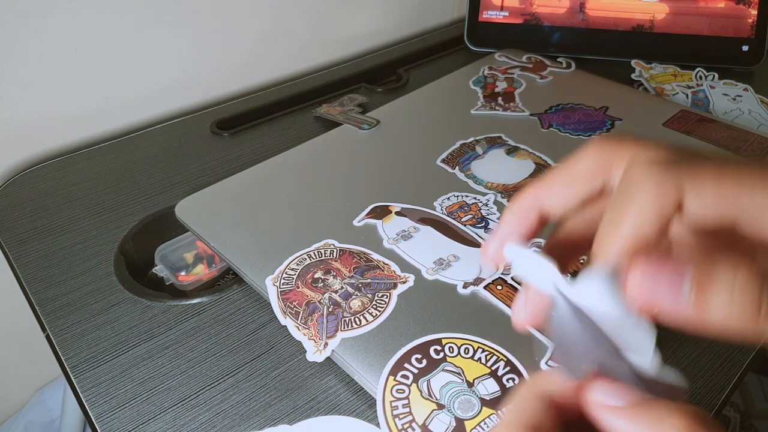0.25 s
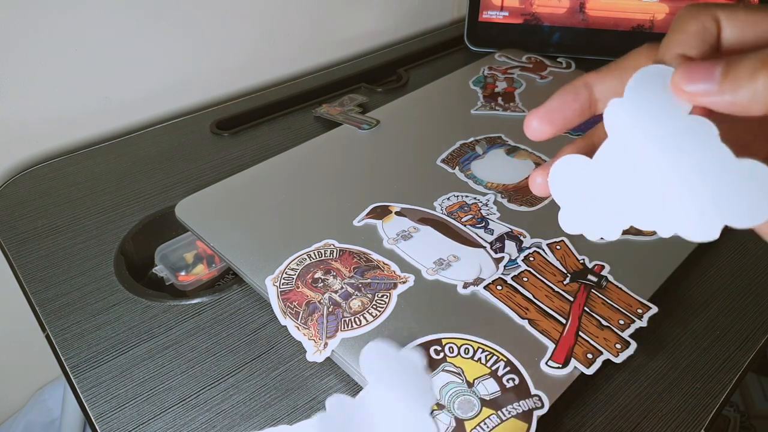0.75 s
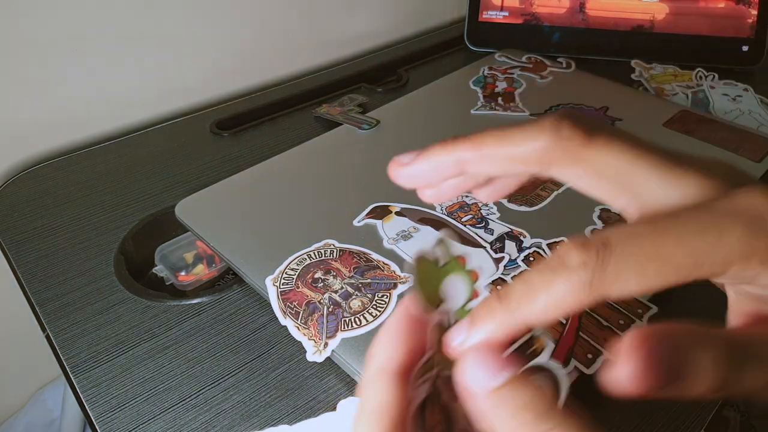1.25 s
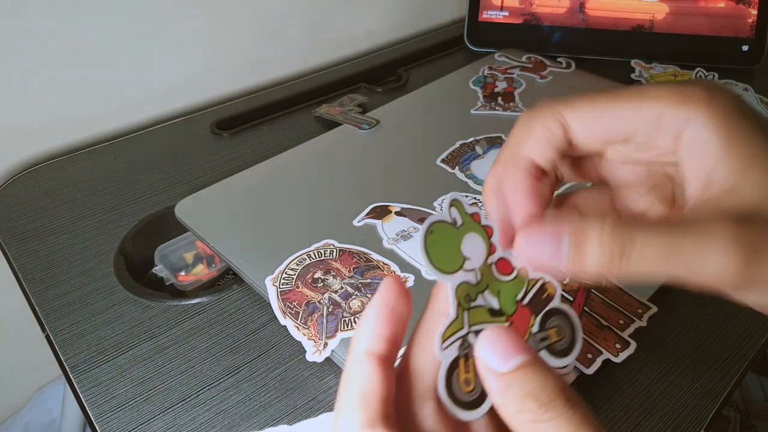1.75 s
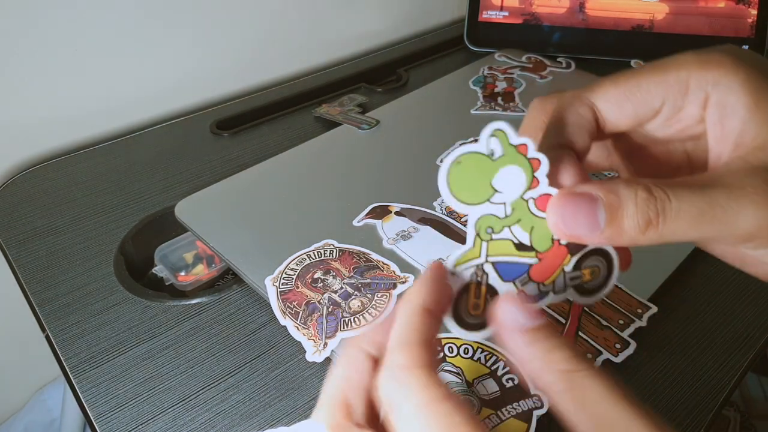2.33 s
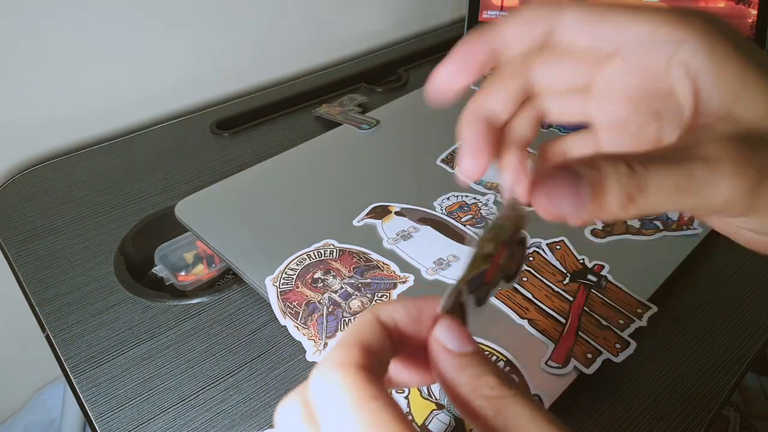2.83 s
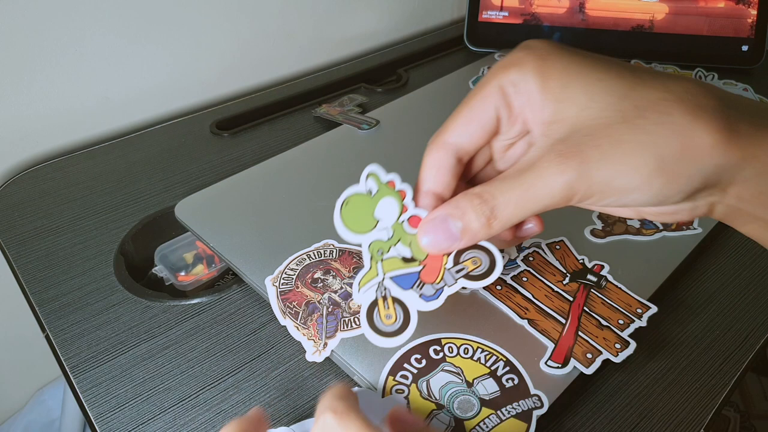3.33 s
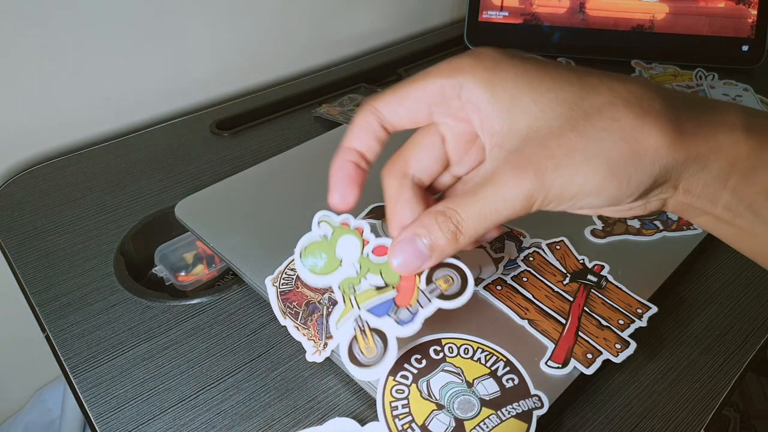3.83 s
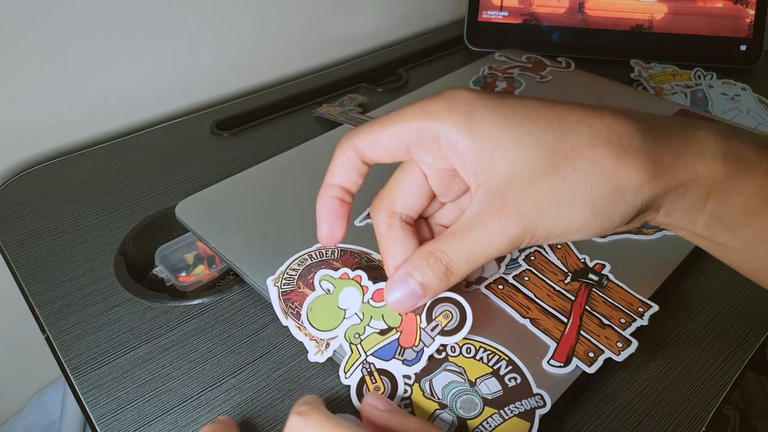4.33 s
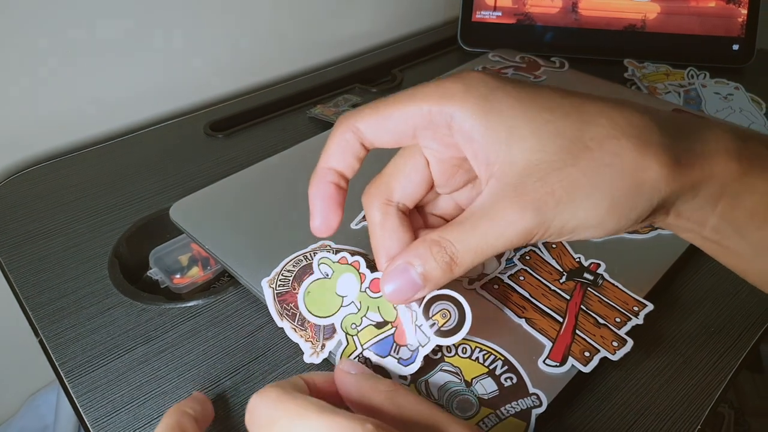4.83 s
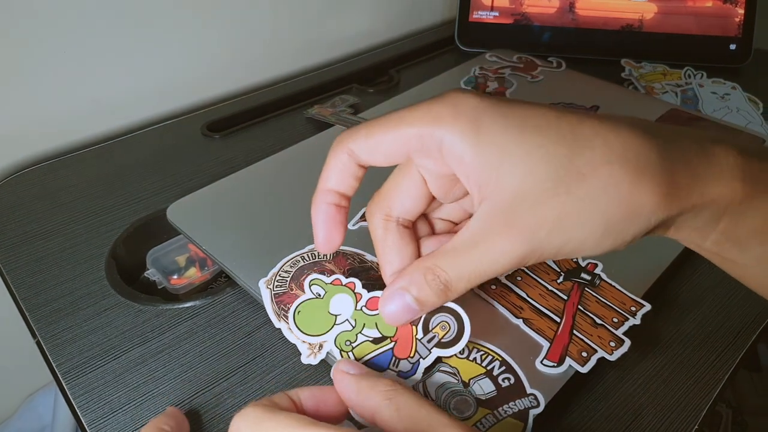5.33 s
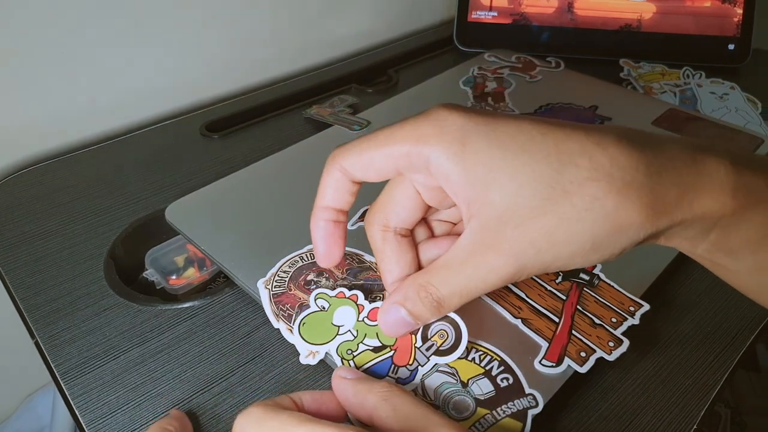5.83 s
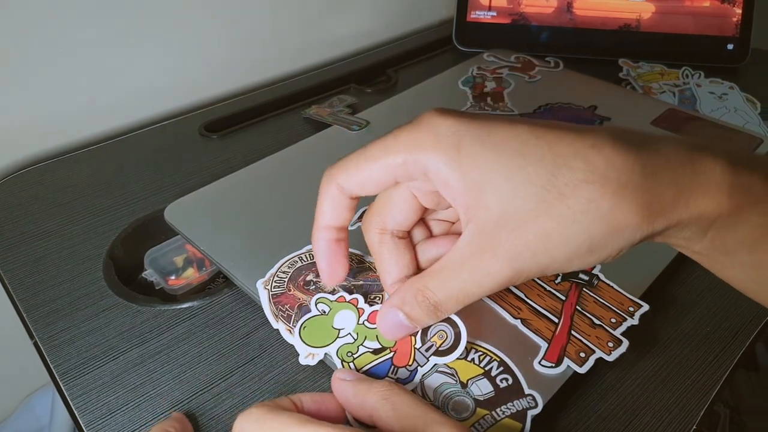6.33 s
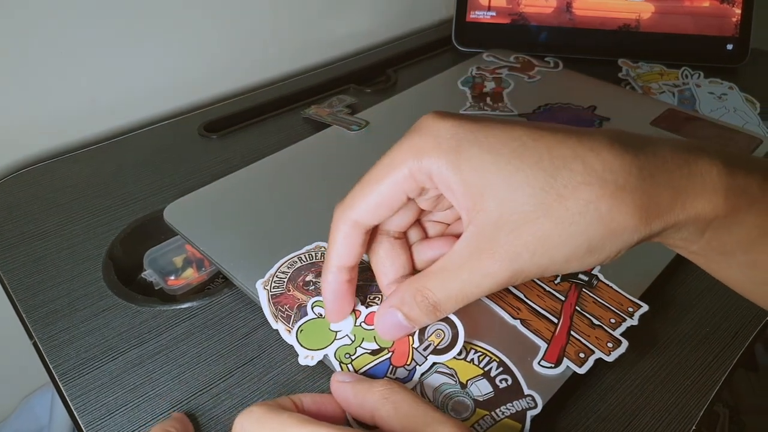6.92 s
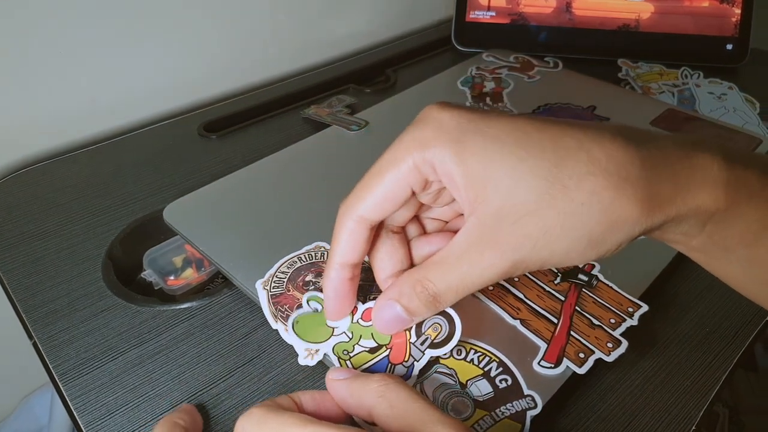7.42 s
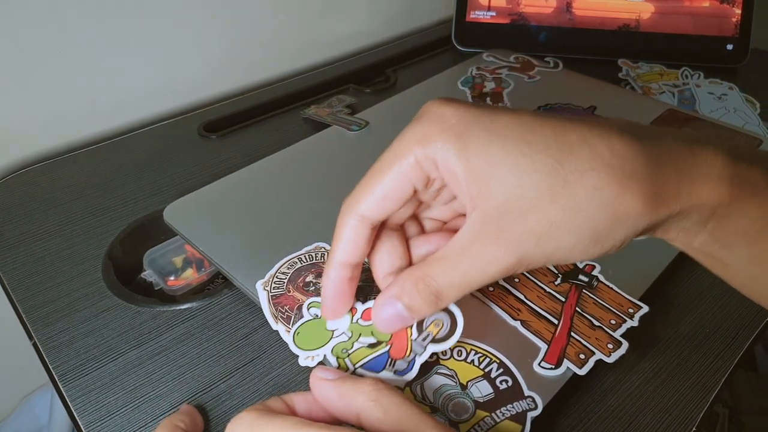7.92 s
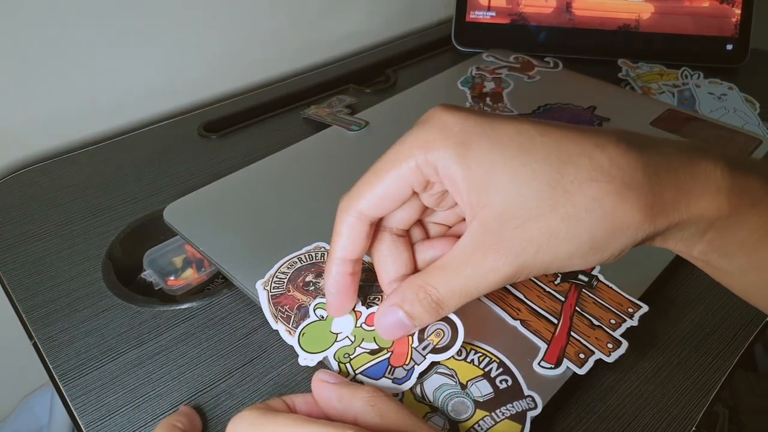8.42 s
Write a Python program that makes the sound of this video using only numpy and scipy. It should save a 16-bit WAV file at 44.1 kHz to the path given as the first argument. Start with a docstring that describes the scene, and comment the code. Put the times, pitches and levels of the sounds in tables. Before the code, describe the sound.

A very close stereo microphone in a small room hears a stiff vinyl sticker handled over a laptop lid, above steady low rumble, muffled air and faint hiss. From 0 to 0.6 s, small crackles quicken into a peel with a soft thud. Light rustles and ticks follow, then a bright snap near 1.3 s and clicks at 1.5 and 1.75 s. Around 2.1-2.2 s comes the densest burst, loud crinkling snaps with a low knock. More pops and dull taps fall at 2.8, 3.05-3.2, 3.65 and 3.8 s over thin rustling. A scrape at 4.8 s leads to a sharp crack at 5.03 s. Then it is nearly still, with barely audible touches and faint narrow whistles; deep hum grows from about 7 s. Crisp snaps break out at 7.47 s and, loudest and brightest, 7.77 s, with a short tail, leaving room rumble until 8.7 s.

```python
"""A stiff vinyl sticker sheet, peeled from its backing by hand and placed on a laptop lid, buckles in bursts
of clicks that ring its modes; glue and skin rustle as clumped random slips driving the same modes.
Fingers thud on the lid as decaying low modes. Filtered noise makes a low rumble, room air, a soft hiss
and a few faint whistles and hums. A small room answers, and a small two-port microphone is close by."""
import sys
import numpy as np
from scipy import signal
from scipy.io import wavfile
from scipy.ndimage import map_coordinates

SR = 44100
rng = np.random.default_rng(int(sys.argv[2]) if len(sys.argv) > 2 else 0)


def log_audio(samples):
    """Write samples as a 16-bit WAV file to the path given in sys.argv[1]."""
    # one column per channel
    frames = np.atleast_2d(samples).T
    # limit to full scale, then quantise
    limited = np.clip(frames, -1, 1)
    pcm = np.round(limited * 32767).astype(np.int16)
    wavfile.write(sys.argv[1], SR, pcm)


N = 382788

# modes of the sheet: (f/Hz, bandwidth/Hz, level/dB)
SHEET_MODES = [(760, 250, -9.5), (1240, 210, -3.5), (2000, 670, 0.76), (2580, 430, 4.6), (3256, 640, 1),
               (4470, 1200, 1.5), (6270, 1100, 3), (8700, 1900, 3.5), (11600, 7400, -2),
               (17000, 2300, -6.5)]


def from_db(db):
    """Amplitude ratio of a level: twenty decibels are a factor of ten."""
    return 10 ** (np.asarray(db) / 20)


def rms_one(x):
    """Normalise the mean power to one."""
    return x / np.sqrt(np.mean(x ** 2) + 1e-20)


def in_time(rows):
    """Linear interpolation of each column of a curve, one value a sample."""
    s, *columns = np.transpose(rows)
    return [np.interp(np.arange(N) / SR, s, c) for c in columns]


def at_hz(points, hz):
    """Spectrum level interpolated on a logarithmic frequency axis."""
    spectrum_hz, level_db = np.array(points).T
    return np.interp(np.log(hz), np.log(spectrum_hz), level_db)


def drift(rate):
    """Random modulation of unit rms: low-passed noise, computed at every 40th sample."""
    r = np.exp(-80 * np.pi * rate / SR)
    white = rng.standard_normal(N // 40 + 2002)
    slow = signal.lfilter([1], [1, -2 * r, r * r], white)[2000:]
    return np.interp(np.arange(N) / 40, np.arange(len(slow)), rms_one(slow))


def resonance(x, hz, width):
    """Damped resonator: a pole pair whose radius sets the bandwidth, scaled to keep a click's energy."""
    r = np.exp(-np.pi * width / SR)
    zeros = np.sqrt((1 - r * r) / 2) * np.array([1, 0, -1])
    poles = [1, -2 * r * np.cos(2 * np.pi * hz / SR), r * r]
    return signal.lfilter(zeros, poles, x + 1e-18)


def peak(x, hz, width, db):
    """Second-order equaliser: the gain ratio of two dampings lifts or cuts one band."""
    w, gain, slack = 2 * np.pi * hz / SR, from_db(db / 2), np.tan(np.pi * width / SR)
    zeros = [1 + slack * gain, -2 * np.cos(w), 1 - slack * gain]
    poles = [1 + slack / gain, -2 * np.cos(w), 1 - slack / gain]
    return signal.lfilter(zeros, poles, x)


def banded_noise(spectrum, patchy_db):
    """Coloured noise of unit rms: half-octave bands, each with its level, flicker and port correlation."""
    # left-right correlation: (f/Hz, likeness from -1 to 1)
    likeness = [(60, 0.74), (180, 0.89), (550, -0.47), (1650, -0.63), (4970, 1), (15000, -0.82)]
    out, edges = 0, 110 * 2 ** np.arange(0, 7.6, .5)
    white = rng.standard_normal((2, 2, N))
    for k, (low, high) in enumerate(zip(edges, edges[1:])):
        hz = np.sqrt(low * high)
        if spectrum[0][0] < hz < spectrum[-1][0]:
            band = signal.butter(2, [low, high], "band", fs=SR, output="sos")
            mid, side = signal.sosfilt(band, white[k % 2])
            alike = np.clip(at_hz(likeness, hz), -1, 1)
            gain = from_db(at_hz(spectrum, hz) + patchy_db * drift(2.7))
            out = out + gain * (np.sqrt(1 + alike) * mid + np.sqrt(1 - alike) * side * [[1], [-1]])
    return rms_one(out)


def clicks(count, per_s, spread_db):
    """Shot noise: impulses at random moments, of uneven size and either sign."""
    sizes = from_db(spread_db * np.minimum(rng.exponential(1, count), 4))
    signs = rng.choice([-1, 1], count)
    return sizes * signs * (rng.random(count) < per_s / SR)


def rumble():
    """Band-limited noise: two deep bands, nearly coherent at both ports, ending steeply on top."""
    # level curves: (t/s, deep band level/dB, upper band level/dB)
    rumble_levels = [(0, -56, -45.5), (.6, -48, -43), (1.5, -62, -45), (2.103, -50.5, -46.5),
                     (4.201, -61, -47.5), (5.3, -51.5, -45.5), (8.68, -58, -44)]
    deep_hz, upper_hz = (48.4, 76.5), (69.5, 106.2)
    out = 0
    for level_db, (low_hz, high_hz) in zip(in_time(rumble_levels), (deep_hz, upper_hz)):
        high_pass = signal.butter(2, low_hz, "high", fs=SR, output="sos")
        low_pass = signal.butter(6, high_hz, fs=SR, output="sos")
        noise = rng.standard_normal((2, N + SR))
        mid, side = signal.sosfilt(np.vstack([high_pass, low_pass]), noise)[:, SR:]
        stereo = rms_one(mid) + from_db(-17) * rms_one(side) * [[1], [-1]]
        out = out + from_db(level_db) * stereo
    return out


def room_air():
    """Diffuse noise of falling spectrum whose level follows a slow curve."""
    # level curve: (t/s, level/dB)
    air_levels = [(0, -51.5), (1.5, -54.5), (4.2, -55), (6, -57), (8.3, -58), (8.68, -54)]
    # relative spectrum: (f/Hz, density level/dB per Hz)
    air_colour = [(120, -16.5), (160, -9.5), (217, -4.5), (326, -1.5), (600, -7), (1130, -13.5),
                  (2000, -39), (3000, -46.5)]
    return from_db(in_time(air_levels)[0]) * banded_noise(air_colour, patchy_db=1.2)


def soft_hiss():
    """Stationary coloured noise with a slight random flicker in each band."""
    # relative spectrum: (f/Hz, density level/dB per Hz)
    hiss_colour = [(700, -22.5), (1000, -8.5), (1310, 1.5), (2390, -3.5), (3860, -7.5), (5280, -14),
                   (7490, -12.5), (9090, -27), (12000, -17.5), (19500, -13.5)]
    return from_db(-67) * banded_noise(hiss_colour, patchy_db=1.5)


def rubbing():
    """Exponential growth and decay: each rub's dB level rises, holds and falls in straight lines."""
    # glue letting go or skin sliding: (start t/s, length/s, drive level/dB, treble level/dB)
    rubs = [(0.367, 0.12, -61, -3), (0.665, 0.021, -81, 3), (0.865, 0.038, -54.5, -3.5),
            (1.247, 0.13, -54.5, -6), (1.5, 0.034, -61, -6), (2.084, 0.06, -44.5, -2),
            (2.415, 0.23, -68.5, -6), (3.04, 0.073, -64, -9), (3.14, 0.0333, -48, -8),
            (3.463, 0.41, -66.5, 1), (4.509, 0.056, -61.5, -13.5), (4.772, 0.38, -58.5, -4),
            (5.247, 0.096, -63, -5), (5.41, 0.041, -73, 2), (5.631, 0.064, -75.5, 1),
            (5.947, 0.038, -76.5, -0.5), (7.473, 0.087, -56.5, 0), (7.652, 0.012, -49.5, -0.5),
            (7.75, 0.027, -49, -1.5)]
    rise_db_per_s, fall_db_per_s = 505, 263.5
    idle_db, idle_highs_db, idle_ends_s = -73, -5, 4.1   # the held sheet rustles until it lies on the lid
    t = np.arange(N) / SR
    level_db = idle_db - fall_db_per_s * np.maximum(t - idle_ends_s, 0)
    highs_db = np.full(N, float(idle_highs_db))
    for start, length, db, bright_db in rubs:
        early, late = np.maximum(start - t, 0), np.maximum(t - start - length, 0)
        rub_db = db - rise_db_per_s * early - fall_db_per_s * late
        highs_db = np.where(rub_db > level_db, bright_db, highs_db)   # the strongest rub sets the treble
        level_db = np.maximum(level_db, rub_db)
    return level_db, highs_db


def rustle_drive():
    """Stick-slip friction: clumped random slips over a finer hiss drive the modes rather evenly."""
    level_db, highs_db = rubbing()
    slips_per_s = 300 * from_db(8 * drift(20))   # slips come in clumps
    grains = clicks(N, slips_per_s, 3.5) + .45 * rng.standard_normal(N)
    grains = rms_one(grains) * from_db(level_db)
    return [grains * from_db(mode_db / 2 + highs_db * (hz > 5500)) for hz, _, mode_db in SHEET_MODES]


def buckle_drive():
    """Snap-through buckling: each burst of folds excites the modes with its own weights."""
    # buckles: (t/s, burst energy level before mode weights/dB, brightness/dB, time scale/ms)
    snaps = [(0.019, -22.5, -4, 4.3), (0.292, -42.5, 21, 1.85), (0.3335, -41.5, 20.5, 2.6),
             (0.372, -32, -6, 2.45), (0.4043, -32, 15, 7.4), (0.438, -37, 23, 3.8), (0.4568, -25.5, 3, 2.2),
             (0.47, -18, 5, 3.8), (0.485, -28, -7, 5), (0.5387, -14, 2, 15), (0.5614, -10, -22.5, 2.21),
             (0.785, -32, -7, 6.7), (0.907, -28, -18, 7.6), (0.929, -20, 0, 3.6), (0.936, -22.5, -5, 5.8),
             (1.0355, -33.5, -2, 2.5), (1.05, -45, 9, 1.6), (1.1803, -14, -19, 8.5),
             (1.2432, -18.5, -1, 5.1), (1.3134, -4.5, 4.5, 14.5), (1.331, -8.5, -24, 1.83),
             (1.5276, -16.5, 3, 2.87), (1.533, -26.5, 0, 1.3), (1.542, -24.5, -52.5, 3.34),
             (1.7409, -12.5, -14, 10.4), (1.7515, -7, -13, 2.18), (1.9606, -25.5, -19, 10.8),
             (2.0817, -17, -3, 0.8), (2.0888, -10, -10, 1.64), (2.109, -25, -6, 0.81),
             (2.1176, -14, -13, 3), (2.126, -19, -8, 2.7), (2.1438, -12, -3, 2.8), (2.148, 1, 9, 15.3),
             (2.16, -4.5, -12, 11), (2.167, -5.5, -7, 1.8), (2.17, -1, -13, 9), (2.1773, 2, -4.5, 12),
             (2.185, -5, 6.5, 5), (2.213, -19, -14.5, 2.9), (2.512, -33, -5, 6.4), (2.787, -34, 12, 3),
             (2.795, -22.5, -8, 9), (2.805, -11, -1, 8.7), (3.0446, -16.5, -19, 8.6),
             (3.0575, -15.5, -23, 2.9), (3.073, -16.5, -29, 1.3), (3.102, -20.5, 4, 8),
             (3.1212, -4.5, -6, 5.6), (3.171, -6.5, -16, 3.64), (3.592, -22, 0, 3.4),
             (3.6523, -18.5, 8, 2.9), (3.6564, -11, -5, 3.08), (3.778, -7.5, -17.5, 2.3),
             (4.7654, -24.5, -5, 6.6), (4.7927, -14, 4, 6.7), (4.868, -28, 12, 5.9),
             (4.9489, -8, -2.5, 1.5), (5.0221, -2.5, 0, 1.93), (5.0245, -5.5, 15.5, 3.5),
             (5.028, 4.5, -5, 2.45), (5.03, -11, -3, 4.3), (5.99, -50.5, 39.5, 5.4),
             (7.0962, -32.5, -10.5, 5.25), (7.2883, -39.5, -34.5, 2.3), (7.463, -31.5, 10, 3.1),
             (7.474, 0.5, -3, 5.27), (7.5357, -10, 21.5, 2.9), (7.551, -21, -6, 6.1),
             (7.7691, -4.5, -6, 2.1), (7.7737, -1, 3, 1.13), (7.7752, 8.5, 7.5, 4.35),
             (7.809, -13, -18, 1.7)]
    highs_db = -5   # treble of a buckle of no brightness
    drive = np.zeros((len(SHEET_MODES), N))
    hz, _, mode_db = np.transpose(SHEET_MODES)
    for s, energy_db, bright_db, ms in snaps:
        at, t = round(s * SR), np.arange(SR // 16) / (ms * SR / 1000)   # t counts time scales
        burst = clicks(len(t), 2500, 5.1) + .4 * rng.standard_normal(len(t))   # folds over a little hiss
        burst[int(.3 * ms * SR / 1000)] = 6.5   # one strong fold early in the burst
        # burst envelope: a brief fade-in, then a bell-shaped decay
        burst *= (0.066 + np.minimum(t / 0.86, 1)) * np.exp(-1.5 * t ** 2)
        burst *= from_db(energy_db) / np.sqrt(np.sum(burst ** 2))
        tilt = [(800, -bright_db / 5), (1500, -bright_db / 2), (2500, 0), (4500, 0),
                (7000, highs_db + bright_db / 2)]
        weights = from_db(mode_db + at_hz(tilt, hz) + rng.normal(0, 1.5, len(hz)))
        drive[:, at:at + len(t)] += weights[:, None] * burst
    return drive


def sheet():
    """Modal superposition: buckles and rustle ring the same modes, summed with alternating sign."""
    buckles, rustle = buckle_drive(), rustle_drive()
    out = 0
    for k, (hz, width, _) in enumerate(SHEET_MODES):
        out = out + (-1) ** k * resonance(buckles[k] + rustle[k], hz, width)
    out = out + from_db(-9.5) * buckles[len(SHEET_MODES) // 2]   # the bare crack of each fold
    high_pass = signal.butter(2, 800, "high", fs=SR, output="sos")   # a small sheet radiates little bass
    return signal.sosfilt(high_pass, out)


def thuds():
    """Impact excitation: a soft contact rings one low mode of lid or desk, with a dull puff of noise."""
    # fingers and wrists: (t/s, envelope level/dB, f/Hz, decay time t60/s, at least 0.03 in use)
    contacts = [(.075, -34, 306, 0.14), (0.556, -23, 310, 0.024), (.655, -40, 302, 0.44),
                (1.327, -27.5, 204, 0.021), (1.503, -39.5, 320, 0.5), (1.75, -30.5, 397, 0.035),
                (2.17, -22.5, 302.3, 0.054), (2.216, -33.5, 611, 0.032), (2.81, -26.5, 250, 0.037),
                (3.055, -20.5, 310, 0.026), (3.171, -29, 519, 0.025), (3.657, -38.5, 295, 0.046),
                (5.026, -28, 154, 0.096), (6.19, -54, 304, 0.14), (6.442, -56.5, 301, 0.3),
                (7.775, -34.5, 307, 0.11)]
    out, t = np.zeros(N + SR), np.arange(SR // 2) / SR
    for s, peak_db, hz, t60 in contacts:
        shape = (1 - np.exp(-t / 0.00078)) * from_db(peak_db - 60 * t / max(t60, .03))
        puff = resonance(rng.standard_normal(len(t)), 1.5 * hz, 700)
        puff = rms_one(resonance(puff, 1.5 * hz, 700))
        at = round(s * SR)
        out[at:at + len(t)] += shape * (.6 * np.sin(2 * np.pi * hz * t) + .4 * puff)
    return out[:N]


def at_ports(x):
    """Interference and arrival-time difference: each port adds its near reflections, the right one later."""
    # where the hands are: (t/s, lag at the right port/ms, left-right level/dB)
    hand_path = [(0, 0.0087, -3), (.9, 0.035, 5), (1.3, 0.049, 1.5), (2.2, 0.041, 5.5), (2.8, 0.088, -7.5),
                 (3.2, 0.087, 2), (5.0, 0.077, -1), (8.7, 0.084, 0.5)]
    # reflections off lid, desk and hands, left port then right: (delay/ms, level/dB, sign)
    near_echoes = [
        [(.45, -12.5, 1), (.9, -4, -1)],
        [(0.405, -2, -1), (0.12, -12, -1)],
    ]
    n, (lag_ms, pan_db) = np.arange(N), in_time(hand_path)
    ports = []
    for echoes in near_echoes:
        heard = x
        for ms, db, sign in echoes:
            heard = heard + np.sign(sign) * from_db(db) * np.interp(n - ms * SR / 1000, n, x)
        ports.append(heard)
    left, right = ports
    right = map_coordinates(right, [n - lag_ms * SR / 1000], order=3)
    return np.array([left * from_db(pan_db / 2), right * from_db(-pan_db / 2)])


def room(x):
    """Reverberation: dense echoes build within milliseconds, then decay, the treble a little more slowly."""
    dull_t60_s, treble_t60_s, split_hz, room_db = 0.22, 0.26, 4200, -4
    t = np.arange(SR // 2) / SR
    clumps_db = 5 * signal.resample(rng.standard_normal(200), len(t))   # echoes come in clumps
    noise = rng.standard_normal((2, len(t))) * from_db(clumps_db)
    dull = signal.sosfilt(signal.butter(1, split_hz, fs=SR, output="sos"), noise)
    tail = dull * from_db(-60 * t / dull_t60_s) + (noise - dull) * from_db(-60 * t / treble_t60_s)
    tail *= (1 - np.exp(-t / .004)) ** 2
    tail *= from_db(room_db) / np.sqrt(np.sum(tail ** 2) / 2)   # energy per port
    return signal.fftconvolve(x[None], tail, axes=1)[:, :N]


def whistles():
    """Narrow-band noise: two equal resonators in series make wavering whistles and low hums, faded in and out."""
    # whistles and hums: (start t/s, end t/s, f/Hz, bandwidth/Hz, level/dB)
    tones = [(1.86, 2.18, 1770, 6, -60), (2.88, 3.05, 1500, 150, -60), (3.82, 4.5, 1550, 200, -67),
             (4.65, 4.76, 3600, 200, -67), (5.54, 5.76, 3800, 180, -67), (5.83, 6.02, 3730, 70, -74),
             (5.82, 6.02, 2800, 40, -71), (5.63, 5.77, 4600, 100, -75), (5.81, 5.9, 4400, 100, -75),
             (5.87, 6.01, 3420, 90, -75), (6.65, 7.0, 3770, 50, -73), (8.38, 8.7, 3450, 120, -69),
             (8.25, 8.68, 1350, 80, -71), (8.53, 8.8, 760, 40, -60), (6.9, 7.4, 100, 8, -43),
             (7.0, 9.2, 55, 5, -44), (7.95, 8.4, 77, 6, -44)]
    out = np.zeros((2, N + SR))
    for start, end, hz, width, db in tones:
        a, b = round(start * SR), round(end * SR)
        noise = rng.standard_normal((2, b - a + SR // 4))
        tone = resonance(resonance(noise, hz, width), hz, width)[:, SR // 4:]
        if width < 7:   # the thinnest tones hold their level
            tone = tone / np.abs(signal.hilbert(tone))
        tone = rms_one(tone if hz > 200 else tone[0])   # low hums are alike at both ports
        out[:, a:b] += from_db(db) * tone * np.sqrt(np.hanning(b - a))
    return out[:, :N]


def scene():
    """Superposition of direct sound, reverberation and background noise."""
    # band the room returns more strongly: (f/Hz, bandwidth/Hz, gain/dB)
    room_lift = (1600, 350, 1.5)
    near, low = sheet(), thuds()
    reverberation = room(peak(near, *room_lift) + from_db(7.5) * low)
    background = room_air() + soft_hiss() + rumble() + whistles()
    return at_ports(near) + low + reverberation + background


def record(dry):
    """Port resonance and overload: the treble is coloured, peaks beyond full scale clip, the top is cut."""
    # microphone port, a peak and the dip above it: (f/Hz, bandwidth/Hz, gain/dB)
    port_colour = [(7490, 1000, 9.5), (9080, 1400, -6)]
    for hz, width, db in port_colour:
        dry = peak(dry, hz, width, db)
    low_pass = signal.ellip(12, .5, 75, 16250, fs=SR, output="sos")   # ripple/dB, stop band/dB, cutoff/Hz
    return signal.sosfilt(low_pass, np.clip(dry, -1, 1))


dry = scene()
out = record(dry)
log_audio(out)
```